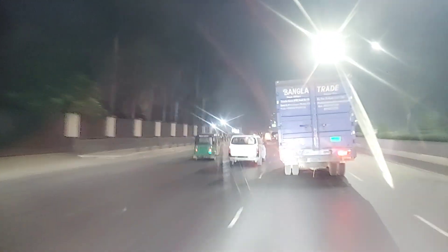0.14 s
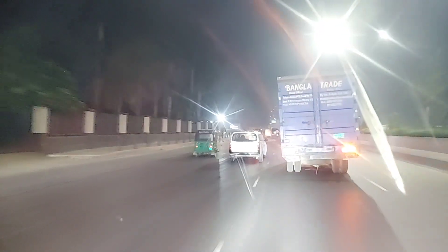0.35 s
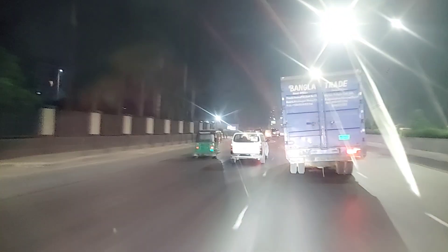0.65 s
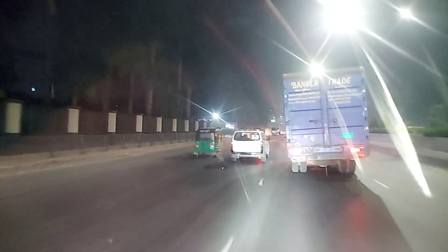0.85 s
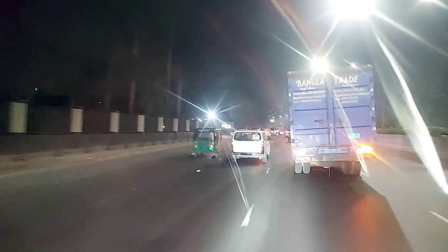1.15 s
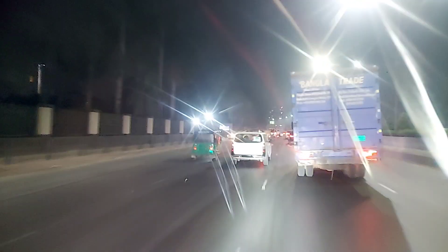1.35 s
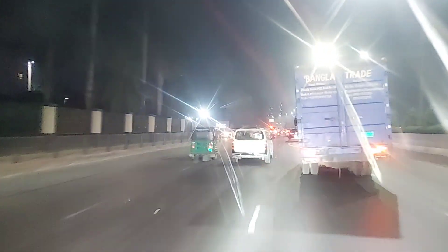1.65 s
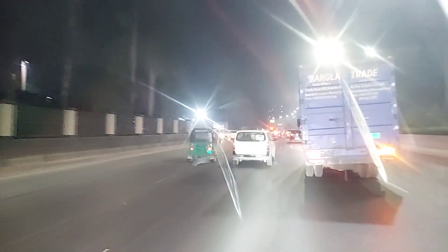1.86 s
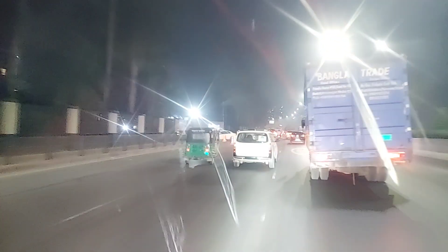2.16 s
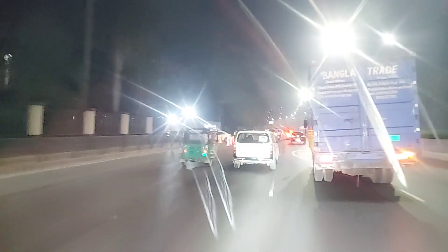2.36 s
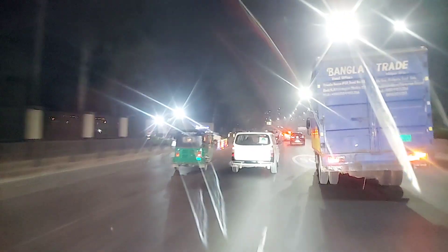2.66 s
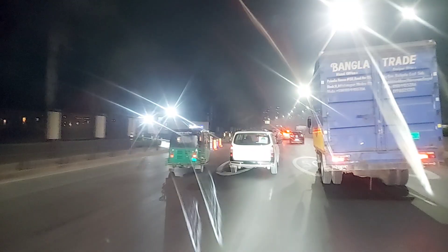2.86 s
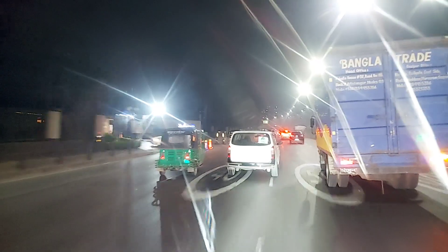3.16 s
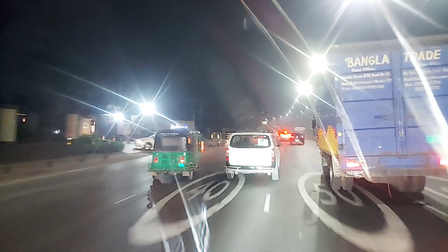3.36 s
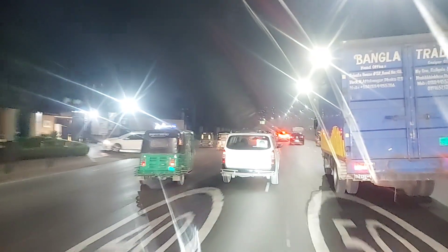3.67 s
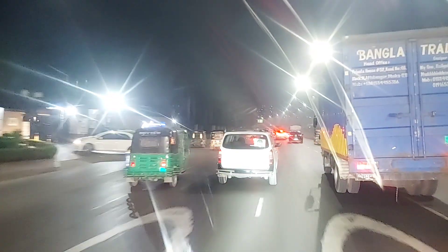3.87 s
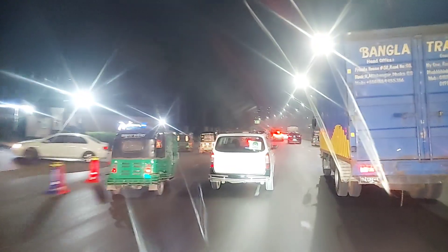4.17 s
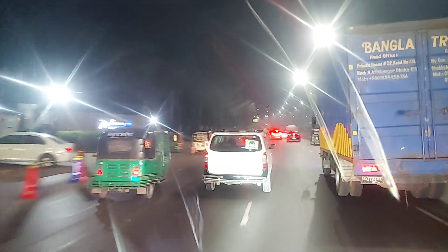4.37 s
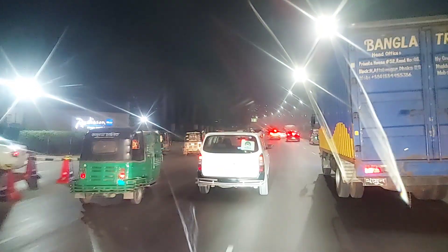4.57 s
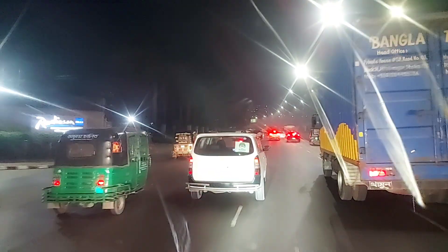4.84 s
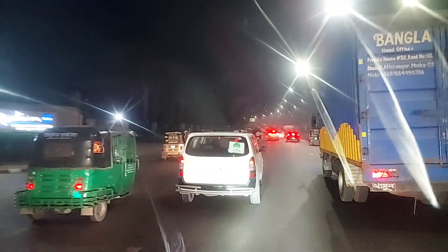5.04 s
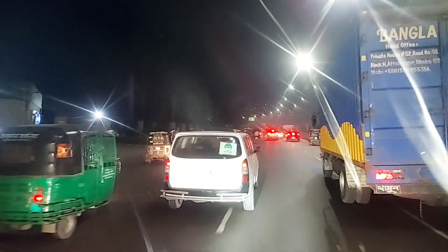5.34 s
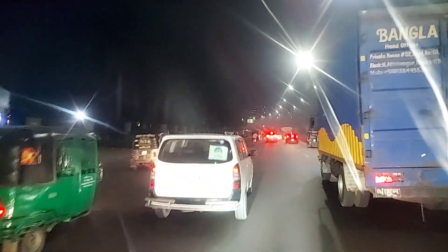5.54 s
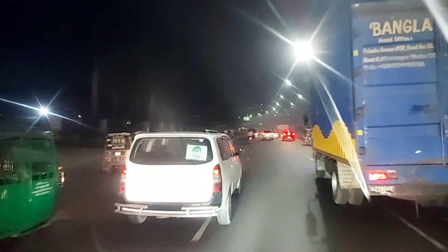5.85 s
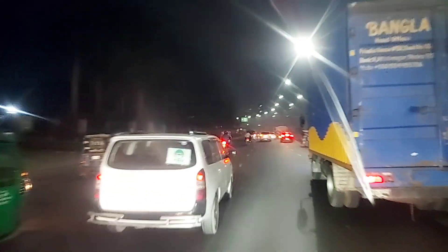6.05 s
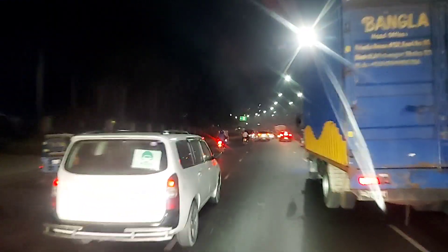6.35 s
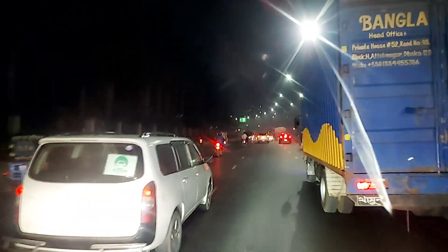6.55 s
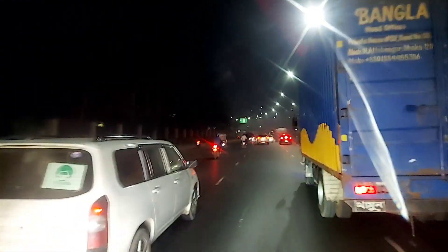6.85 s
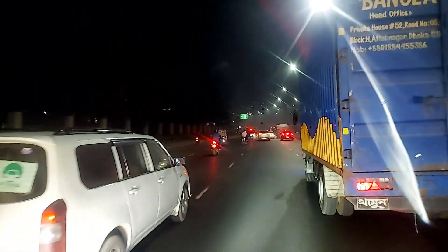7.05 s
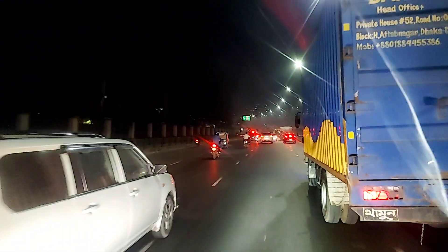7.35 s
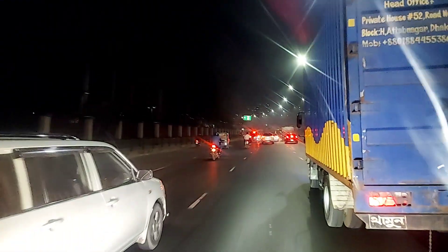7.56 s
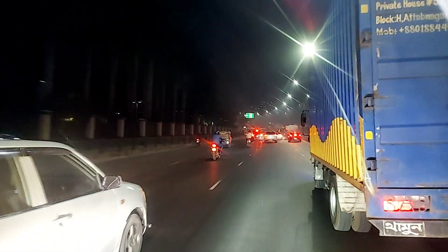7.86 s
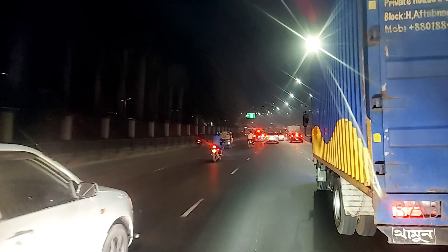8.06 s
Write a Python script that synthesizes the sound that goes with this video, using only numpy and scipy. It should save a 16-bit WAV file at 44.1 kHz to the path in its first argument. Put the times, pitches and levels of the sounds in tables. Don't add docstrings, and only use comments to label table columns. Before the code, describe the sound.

Night road heard inside a lorry cab: deep diesel drone and rumble, loose trim ticking, then three loud two-tone horn blasts past traffic.

```python
import sys
import numpy as np
from scipy import signal
from scipy.fft import rfft, irfft
from scipy.io import wavfile
from scipy.ndimage import uniform_filter1d, minimum_filter1d, map_coordinates

SR = 44100
rng = np.random.default_rng(int(sys.argv[2]) if len(sys.argv) > 2 else 0)


def waveform_to_disk(signal):
    frames = np.transpose(np.atleast_2d(signal))
    scaled = np.clip(frames, -1, 1) * 32767
    samples = np.round(scaled).astype(np.int16)
    wavfile.write(sys.argv[1], SR, samples)


def ratio(d):
    e = np.asarray(d, float) / 20
    return 10 ** e


N = 362061

# start_s, firing_hz, firing_db, load [0-1]
ENGINE_COURSE = [(0.0, 61.8, -19, 0), (0.3, 62.26, -19.5, 0.46), (0.75, 63.82, -16.5, 0.95),
                 (1.25, 65.47, -18.5, 0.99), (1.75, 66.8, -20, 1), (2.5, 69, -19, 0.95),
                 (2.68, 68.45, -30, 0.97), (2.92, 68.14, -17.5, 0.35), (3.5, 67.55, -17, 0.17),
                 (4.25, 67.25, -18, 0.59), (4.7, 66.2, -21.5, .3), (5.25, 66.9, -21, 0.6),
                 (5.7, 65.18, -19, 0), (6.05, 66.77, -26, 0.86), (6.75, 68.06, -24, 0.87),
                 (7.25, 67.06, -23, .25), (7.75, 66.4, -22.5, 0.83), (8.21, 65.7, -18.5, 0.1)]
# start_s, coarseness_db, traffic_db
ROAD_COURSE = [(0.0, -1.5, -1.5), (0.9, -1, 0), (1.65, 1, -0.5), (2.22, 0.5, 0), (2.81, 1.5, -0.5),
               (3.16, 1.5, 0.5), (3.75, 0, -1), (4.25, 0.5, 0.5), (5.12, -5.5, -0.5), (5.78, 0.5, 0),
               (6.08, -2.5, -2), (6.63, -7, 0.5), (6.88, -4, 0.5), (7.45, -1, 5), (7.8, -3.5, 5),
               (8.21, -5, 5.5)]
# down_s, up_s, level_db, release_stretch [ratio]
BLAST_TIMES = [
    (4.31, 4.611, 0.7, 1.07),
    (4.731, 5.705, 0.33, 0.6),
    (7.296, 8.133, 0.7, 0.7),
]


def curves(rows):
    s, *cols = np.transpose(rows)
    return [np.interp(np.arange(N) / SR, s, c) for c in cols]


def unit(x):
    return x / np.sqrt(np.mean(x ** 2) + 1e-20)


def wobble(rate):
    return map_coordinates(rng.standard_normal(int(N * rate / SR) + 4), [np.arange(N) * rate / SR])


def turns(hz):
    return 2 * np.pi * np.cumsum(hz) / SR


def rush(table, lo_hz, hi_hz, patchy_db):
    z = signal.stft(rng.standard_normal((2, N)), nperseg=512)[2]
    field = uniform_filter1d(rng.standard_normal(z.shape[1:]), size=5, axis=0)
    field = uniform_filter1d(field, size=8, axis=1)
    patchy = signal.istft(z * ratio(patchy_db * unit(field)), nperseg=512)[1][:, :N]
    a, b = rfft(patchy)
    f = np.fft.rfftfreq(N, 1 / SR)
    hz, *cols = np.transpose(table)
    left_db, right_db, alike = (np.interp(np.log(f + 1), np.log(hz), c) for c in cols)
    u = np.arccos(np.clip(alike, -1, 1)) / 2
    left = np.cos(u) * a + np.sin(u) * b
    right = np.cos(u) * a - np.sin(u) * b
    pair = ratio([left_db, right_db]) * [left, right]
    band = irfft(pair.mean(0) * (f > lo_hz) * (f < hi_hz), N)
    top_hz = 15850
    return irfft(pair * (f < top_hz), N) / np.std(band)


def knocks(rows, attack):
    out, t = np.zeros(N + SR), np.arange(9000) / SR
    for s, hz, db, t60 in rows:
        swing = ratio(db - 60 * t / t60) * (1 - np.exp(-t / attack))
        out[round(s * SR):][:len(t)] += swing * np.sin(2 * np.pi * hz * t)
    return out[:N]


def port_hiss():
    # frequency_hz, left_db, right_db, coherence [-1 to 1]
    port_spectrum = [(9000, -29, -32, .01), (12600, -28, -17, .01), (14600, -16, 26, .01),
                     (15900, -9, 13, .01)]
    return ratio(-67.0) * rush(port_spectrum, 12000, 16000, patchy_db=-1.0)


def air_puffs():
    # centre_s, half_length_s, level_db
    puff_times = [(3.059, 0.027, -57), (3.14, .015, -60), (3.264, 0.011, -61), (3.461, .025, -59),
                  (3.62, .01, -63), (3.802, 0.013, -58), (4.276, 0.018, -54), (5.03, 0.071, -54),
                  (7.24, .03, -60)]
    # frequency_hz, left_db, right_db, coherence [-1 to 1]
    puff_spectrum = [(1490, -22, -24, .1), (2640, 21.5, 7, .1), (3700, 4, 15, .1), (5000, -7, -6, .1),
                     (8000, 3, -16, .1), (11000, -10, -12, .1), (15000, -5, -1, .1)]
    t = np.arange(N) / SR
    swell = sum(ratio(db) * np.exp(-((t - s) / half) ** 2) for s, half, db in puff_times)
    return swell * rush(puff_spectrum, 5000, 15500, patchy_db=5.5)


def road():
    # frequency_hz, left_db, right_db, coherence [-1 to 1]
    drone_spectrum = [(18, -29, -30, 0.88), (30, -8, -9, 0.88), (48, 10.5, 12.5, 0.95), (73, 7.5, 11, 0.99),
                      (85, 4, 1.5, 1), (202, 1, 3, 0.87), (335, -1, -2, 0.85), (521, -7, -10.5, 0.88),
                      (970, -51.5, -64, .2)]
    roar_spectrum = [(249, -1.5, -21, 0.99), (460, 4.5, 2.5, 0.62), (702, -1, 0.5, 0.041),
                     (955, -2, -7, -0.5), (1540, -10.5, -7, -0.37), (2080, -16.5, -19, 0.44),
                     (3200, -33, -42, -0.71), (5000, -60, -63, .1)]
    tyre_spectrum = [(1460, 0, 7.5, -.1), (2700, 11, 9, 0.071), (3400, 4, 6, 0.06),
                     (4750, -0.5, -2.5, 0.036), (5700, -4.5, -8, .05), (7360, -10, -40, .05),
                     (9100, -10.5, -23, .05), (12000, -28, -35, .05)]
    hiss_spectrum = [(5000, -35, -30, .05), (7100, 2.5, -44, .05), (9400, -9.5, -4, .05),
                     (10800, -5.5, -5, .05), (13000, -16, -3.5, .05), (15900, -16, 0.5, .05)]
    # level_db, coarseness_share [ratio], traffic_share [ratio], full_load_db
    layers = [
        (-25, 0.86, .01, -0.5),
        (-39.5, 0.3, 0.55, 0.4),
        (-59.5, .01, 1.03, -0.93),
        (-67, .01, 1.1, 3.5),
    ]
    coarse_db, traffic_db = curves(ROAD_COURSE)
    load = curves(ENGINE_COURSE)[2]
    drone_db, roar_db, tyre_db, hiss_db = (
        db + a * coarse_db + b * traffic_db + load_db * load for db, a, b, load_db in layers)
    shake = wobble(45)
    drone = ratio(drone_db) * rush(drone_spectrum, 87, 354, patchy_db=1.0)
    roar = ratio(roar_db + 1.0 * shake) * rush(roar_spectrum, 569, 740, patchy_db=1.12)
    tyre = ratio(tyre_db + 0.73 * shake) * rush(tyre_spectrum, 4225, 5330, patchy_db=0.8)
    hiss = ratio(hiss_db + 1.0 * shake) * rush(hiss_spectrum, 7200, 13300, patchy_db=1.5)
    return drone + roar + tyre + hiss


def panels():
    # frequency_hz, level_db, wavering_per_s
    panel_modes = [(139.6, -35.5, 14), (376.8, -40, 16), (434, -42, 16), (270.6, -41.5, 10)]
    t = np.arange(N) / SR
    hum = np.zeros(N)
    for hz, db, rate in panel_modes:
        waver = wobble(rate) + 1j * wobble(rate)
        hum += ratio(db) * np.imag(waver * np.exp(2j * np.pi * hz * t))
    return hum * ratio([[-1.2], [1.2]])


def passing_car():
    t = np.arange(N) / SR
    centre_s, half_length_s, hum_hz, hum_db = 7, 1.1, 113.5, -34.5
    swell = ratio(hum_db) * np.exp(-((t - centre_s) / half_length_s) ** 4)
    return np.sqrt(2) * swell * np.sin(2 * np.pi * hum_hz * t) * ratio([[.3], [-.3]])


def cab_boom():
    # centre_s, level_db
    jolts = [(0.16, -17), (0.4, -39), (1.2, -21), (1.42, -32), (1.58, -25), (2.4, -35), (2.58, -30),
             (2.79, -25), (3.0, -18), (3.35, -36), (3.6, -25), (3.86, -22), (4.25, -19), (4.37, -21),
             (4.6, -24), (4.85, -22), (5.1, -19), (5.54, -24), (5.81, -26), (6.1, -22), (6.42, -26),
             (6.82, -37), (7.13, -18), (7.39, -19), (7.8, -31), (8.1, -32)]
    rise_s, fall_s, rest_db = 0.069, 0.062, -33.5
    t = np.arange(N) / SR
    swell = ratio(rest_db)
    for s, db in jolts:
        swell = swell + ratio(db) * np.exp(-((t - s) / np.where(t < s, rise_s, fall_s)) ** 2)
    return np.sqrt(2) * swell * np.sin(turns(54.2 + 1.6 * wobble(12))) * ratio([[.3], [-.3]])


def engine():
    # firing_multiple, level_db
    steady_orders = [(.75, -51), (2, -38), (4, -43), (1.5, -41.5)]
    hz, firing_db, load = curves(ENGINE_COURSE)
    phase = turns(hz) + 0.21 * wobble(9)
    third_peak_db, floor_panel_hz, floor_panel_width_hz = -33.5, 203.6, 3.9
    detune = (3 * hz - floor_panel_hz) / floor_panel_width_hz
    third_db = third_peak_db - 10 * np.log10(1 + detune ** 4)
    third_db = third_db + 1.4 * wobble(3.3) + .9 * curves(ROAD_COURSE)[0]
    full_load_whine_db, load_range_db = -28.5, 39
    whine_db = full_load_whine_db + load_range_db * (load - 1) + 1.6 * wobble(8.7)
    orders = [(1, firing_db + 0.35 * wobble(11)), (3, third_db), (7 / 2, whine_db)] + steady_orders
    note = np.zeros(N)
    for k, db in orders:
        note += ratio(db + 0.73 * wobble(6.1)) * np.sin(k * phase + 6 * rng.random())
    t = np.arange(N) / SR
    whistle = ratio(-54 - 9 * t) * np.sin(51.0 * phase)
    return np.sqrt(2) * note * ratio([[.3], [-.3]]) + whistle * [[.5], [1]]


def bump():
    # start_s, frequency_hz, peak_db, t60_s
    bump_modes = [
        (5.668, 106.1, 2.5, 0.073),
        (5.669, 142.5, -15, 0.0794),
    ]
    return knocks(bump_modes, attack=0.0032)


def padded_knocks():
    # start_s, frequency_hz, peak_db, t60_s
    nudges = [(.9935, 1178, -17, .03), (1.972, 800, -27, 0.022), (2.183, 1197, -26, .02),
              (2.983, 1300, -18, 0.021), (5.753, 1153, -15, 0.024), (5.785, 1150, -22, .025),
              (5.886, 1200, -13, .02), (6.094, 1250, -20, .03), (6.119, 897, -24, .02),
              (6.276, 800, -26, 0.019), (6.876, 1300, -21, .015), (6.882, 1050, -12, 0.016)]
    return knocks(nudges, attack=0.0011) * ratio([[-14], [0]])


def seal_squeaks():
    # start_s, frequency_hz, peak_db, t60_s
    squeaks = [(2.992, 7200, -49, 0.024), (3.036, 7300, -42, .02), (3.058, 7300, -29, 0.021),
               (3.054, 13800, -47, .1), (3.054, 14500, -44, .1)]
    return knocks(squeaks, attack=0.0031) * ratio([[.5], [-6]])


def flight(s, db):
    # tap_s, delay_s
    odd_flights = [(0.2148, .0115), (1.858, .0105), (2.3771, .012), (2.4148, .0126), (6.9054, .0163)]
    usual_s = .013 + .0002 * (db + 20.5)
    return next((delay for tap, delay in odd_flights if abs(tap - s) < .003), usual_s)


def panel_ring(t, modes, db, low_db):
    hz, level_db, t60, ms = np.transpose(modes)[:, :, None]
    scatter = rng.standard_normal((2, len(modes), 1))
    age = np.maximum(t - ms / 1000, 0)
    low_colour_db = (hz < 1200) * (low_db - 10.5)
    hard_colour_db = (hz > 4000) * 0.85 * (db + 20.5)
    colour_db = low_colour_db + hard_colour_db + 1.6 * scatter[0]
    rise_s = np.where(hz < 1200, 0.00015, .00007)
    swing = ratio(db + 19.5 + level_db + colour_db - 60 * age / t60) * (1 - np.exp(-age / rise_s)) ** 2
    ring = -swing * np.sin(2 * np.pi * hz * (1 + scatter[1] / 80) * age)
    return ring.sum(0)


def trim():
    # start_s, level_db, low_ring_db, rebound_db
    taps = [(0.139, -21.5, 8.5, -11), (0.2148, -27.5, 8, -12), (0.2911, -21, 7, -34),
            (0.672, -21, 7.5, -22), (0.722, -20.5, 10, -34), (0.96, -17.5, 11, -34), (1.05, -31, 11, -20),
            (1.0858, -27, 9.5, -20), (1.1362, -27.5, 12, -12), (1.3205, -17.5, 10, -35),
            (1.4161, -20.5, 7, -15), (1.4744, -16, 11, -21), (1.8326, -19.5, 11.5, -32),
            (1.858, -29, 12, -5), (2.124, -18, 7.5, -39), (2.3766, -27, 9.5, -20), (2.4145, -21, 8, -8),
            (2.7598, -18, 6.5, -11), (5.6096, -18.5, 9, -28), (5.709, -17, 10, -41), (5.7642, -22, 11, -26),
            (5.822, -20.5, 8, -30), (5.8961, -17.5, 7, -25), (5.984, -17.5, 9, -27), (6.0616, -18, 9, -18),
            (6.3, -22.5, 10.5, -16), (6.358, -21.5, 10.5, -28), (6.5898, -18, 9.5, -17),
            (6.8276, -18, 9.5, -30), (6.905, -17.5, 11, -10.5)]
    # start_s, level_db
    grazes = [(0.5628, -42), (1.4535, -46), (1.9485, -38), (2.0778, -39), (3.048, -35), (6.5596, -30.5)]
    # frequency_hz, level_db, t60_s, arrival_ms
    near_modes = [(476, -12.5, 0.026, 0.95), (497, -8, 0.022, 1.01), (925, 2, 0.0064, 0.019),
                  (1150, -13, 0.021, 0.65), (1814, -17.5, 0.014, 0.46), (2044, -14, 0.011, 0.049),
                  (3280, -13, 0.01, 0.027), (4020, -24, 0.0079, 0.13), (4720, -19, 0.0068, 0.15),
                  (9160, -30, 0.008, 0.034), (10480, -28, 0.0058, 0.01), (11750, -29.5, 0.0056, 0.019),
                  (13600, -31, .003, 0.023), (15700, -35, .003, .02)]
    far_modes = [(330, -19, 0.025, 1.3), (563, -23, 0.025, 1.2), (1230, -24, .008, 1.0),
                 (2200, -33, 0.0062, 0.4), (3230, -30, 0.009, 0.17), (4100, -33, .006, .3),
                 (7440, -39, 0.006, 0.2), (8900, -42, .004, .05), (10300, -43, .004, .05),
                 (13000, -45, .003, .05), (15500, -46, .003, .05)]
    out, t = np.zeros((2, N + SR)), np.arange(2400) / SR
    chatter_pass = signal.butter(4, [600, 5000], "bandpass", fs=SR, output="sos")
    chatter_notch = signal.butter(1, [2350, 3000], "bandstop", fs=SR, output="sos")
    chatter_band = np.vstack([chatter_pass, chatter_notch])
    rebounds = [(s + flight(s, db), db + back_db) for s, db, _, back_db in taps]
    soft_ring_db = 11.5
    contacts = [row[:3] for row in taps] + [(s, db, soft_ring_db) for s, db in rebounds + grazes]
    for s, db, low_db in contacts:
        for port, modes, chatter_db in zip(out, (far_modes, near_modes), (-5, 4)):
            ring = panel_ring(t, modes, db, low_db)
            chatter = ratio(db + chatter_db - 60 * t / 0.021) * (1 - np.exp(-t / 0.0023))
            rattle = signal.sosfilt(chatter_band, chatter * rng.standard_normal(len(t)))
            port[round(s * SR) - 4:][:len(t)] += ring + rattle
    glass_s, glass_db = .0068, -18
    lag = round(glass_s * SR)
    out[:, lag:] += ratio(glass_db) * out[:, :-lag].copy()
    return out[:, :N]


def echo(rows, multiple, t, down):
    gain = np.ones(N, complex)
    for k, share, beat_hz, dip, db in rows:
        if k == multiple:
            during = down == down[min(round((dip + .005) * SR), N - 1)]
            gain[during] = ratio(db) * (1 - share * np.exp(2j * np.pi * beat_hz * (t[during] - dip)))
    return gain


def horn(pitch, drive, tone, presses, echoes):
    pitch_hz, start_hz, glide = pitch
    attack, over_db, sag_db, release, end_hz = drive
    t = np.arange(N) / SR
    press = np.clip(np.searchsorted([row[0] for row in BLAST_TIMES], t) - 1, 0, None)
    down, up, db, stretch = np.transpose(BLAST_TIMES)[:, press]
    lag_ms, offset_hz, climb = np.transpose(presses)[:, press]
    age = np.maximum(t - down, 0)
    gone = np.maximum(t - up, 0) / (release * stretch)
    settle_s = 0.022
    drive_db = db + over_db * np.exp(-age / settle_s) - sag_db * age - 8 * gone ** 2
    drive_db = np.maximum(drive_db + 20 * np.log10(np.minimum(age / attack, 1) + 1e-6), -120)
    bend = turns(start_hz * np.exp(-age / glide) * (age > 0) + end_hz * np.tanh(gone) ** 2)
    phase = 2 * np.pi * ((pitch_hz + offset_hz) * (age - lag_ms / 1000) + climb * age ** 2 / 2)
    phase = phase + bend - np.interp(down, t, bend) + 0.04 * wobble(54)
    stir = np.interp(t, [5.8, 7.2], [.018, .045])
    out = np.zeros((2, N))
    for k, left_db, right_db, lead in tone:
        slack_db = np.minimum(drive_db + 1.0, 0) * (0.24 * k - 0.3684)
        swing = ratio(drive_db + slack_db - 2.3 * (k - 0.5) * np.minimum(gone, 3))
        rate = 6 + 2 * min(k, 8)
        for port, level_db, shift, rows in zip(out, (left_db, right_db), (lead / 2, -lead / 2), echoes):
            waver = 1 + stir * min(k, 8) ** .8 * (wobble(rate) + 1j * wobble(rate))
            turning = np.exp(1j * (k * phase + k * k / 2 + shift))
            port += ratio(level_db) * swing * np.imag(waver * echo(rows, k, t, down) * turning)
    return np.sqrt(2) * out


def low_horn():
    # multiple, left_db, right_db, left_lead_rad
    low_partials = [(1, -25, -21.5, 0.45), (2, -25.5, -23, 1.9), (3, -28, -23.5, 1.05),
                    (4, -29, -32.5, 2.5), (5, -26, -43.5, 1.7), (6, -34.5, -41, -1), (7, -36.3, -40, -1.9),
                    (8, -43.5, -43.5, -2.9), (9, -46.5, -57, 1.6), (10, -64, -64, 5.5), (11, -79, -83, -1),
                    (12, -85, -76, -8), (13, -75, -76, 2), (14, -59.5, -72, 3.5), (15, -64, -76, -0.5),
                    (16, -87, -80, 8), (17, -76, -84, -1), (18, -65, -87, 4), (19, -64, -85, 3),
                    (20, -66, -88, 2)]
    # contact_lag_ms, pitch_offset_hz, climb_hz_per_s
    low_presses = [(0, -.2, 0), (0, -.253, .56), (0, -.085, .147)]
    # multiple, echo_share [0-1], beat_hz, deepest_dip_s, mean_gain_db
    low_left = [(1, .4, 1, 4.56, 3), (3, .1, 4.9, 4.35, 1), (4, .1, 2.6, 4.54, .7), (7, .2, 4.9, 4.31, .8),
                (2, .4, 1.1, 4.82, -1), (3, .2, 2.5, 4.91, 0), (4, .2, 2.7, 4.95, .7),
                (6, .1, .9, 4.84, .7), (7, .3, 4.7, 4.93, -2), (8, .4, 1, 5.58, -1.5),
                (1, .2, 2.5, 7.52, .5), (2, .2, 1.9, 7.56, .3), (3, .3, 1.4, 7.94, .8),
                (4, .4, 1.3, 7.68, -1.3), (5, .2, .6, 8.12, 0), (9, .2, 2.1, 7.31, 1.5),
                (6, .2, 1.5, 7.83, .3), (7, .3, .5, 8, 1.3)]
    low_right = [(1, .2, 2.3, 4.53, 0), (3, .1, 3.4, 4.47, -1), (4, .7, 1.2, 4.48, 2.3),
                 (6, .3, 4.9, 4.4, -2.7), (8, .6, 1.2, 4.48, 4.4), (4, .3, 2.6, 4.83, 0),
                 (7, .2, 4.8, 4.88, .3), (2, .4, .7, 8.13, -1.5), (3, .2, 2.1, 7.42, 1.2),
                 (4, .2, 4.1, 7.41, 1.3), (6, .5, 1.7, 7.8, .6), (7, .6, 2.7, 7.52, -5),
                 (8, .7, .7, 7.72, 2.9)]
    pitch = (397.62, 3.5, .03)  # pitch_hz, starting_rise_hz, settling_s
    drive = (0.033, 1.6, 1.9, 0.038, 23)  # attack_s, overshoot_db, sag_db_per_s, release_s, end_rise_hz
    return horn(pitch, drive, low_partials, low_presses, (low_left, low_right))


def high_horn():
    # multiple, left_db, right_db, left_lead_rad
    high_partials = [(1, -32, -22.5, -.4), (2, -21.3, -24, 2), (3, -43, -27, -1), (4, -32.3, -41, 1.7),
                     (5, -50, -50, 3), (6, -53, -60, -2), (7, -62, -60, -1.8), (8, -64, -67, 2)]
    # contact_lag_ms, pitch_offset_hz, climb_hz_per_s
    high_presses = [(.258, .358, 0), (.091, .055, -.13), (.407, -.403, .549)]
    # multiple, echo_share [0-1], beat_hz, deepest_dip_s, mean_gain_db
    high_left = [(2, .1, 4.9, 4.31, -1.7), (2, .3, 1.6, 5.11, -.7), (2, .4, .5, 8, 0),
                 (4, .1, 1, 7.5, -2.5)]
    high_right = [(1, .2, 4.9, 4.39, .2), (2, .7, 2.6, 4.6, -2.5), (2, .5, 1.8, 5.26, -1.6),
                  (3, .2, .9, 4.9, -.8), (1, .3, 1.2, 7.88, -1), (2, .2, .8, 7.98, -.4),
                  (3, .2, 1.1, 7.57, 0), (4, .3, 1, 7.5, -6)]
    pitch = (498, 1.2, .03)  # pitch_hz, starting_rise_hz, settling_s
    drive = (0.03, 0.78, 2.9, 0.06, 5.5)  # attack_s, overshoot_db, sag_db_per_s, release_s, end_rise_hz
    return horn(pitch, drive, high_partials, high_presses, (high_left, high_right))


def two_tone_horn():
    tones = low_horn() + high_horn()
    lorry_echo_s, lorry_echo_db = .048, -24
    lag = round(lorry_echo_s * SR)
    tones[:, lag:] += ratio(lorry_echo_db) * tones[:, :-lag].copy()
    return tones


def scene():
    background = port_hiss() + air_puffs() + road() + panels() + passing_car()
    cab = cab_boom() + engine() + bump()
    contacts = padded_knocks() + seal_squeaks() + trim()
    return background + cab + contacts + two_tone_horn()


def band_limit(x):
    return signal.sosfilt(signal.butter(12, 16980, fs=SR, output="sos"), x)


def record(dry):
    top_hz = 16650
    x = irfft(rfft(dry) * (np.fft.rfftfreq(N, 1 / SR) < top_hz), N)
    need = np.minimum(1, .97 / (np.abs(x).max(0) + 1e-9))
    gain = uniform_filter1d(minimum_filter1d(need, size=45), size=23)
    return band_limit(x * gain)


dry = scene()
out = record(dry)
waveform_to_disk(out)
```